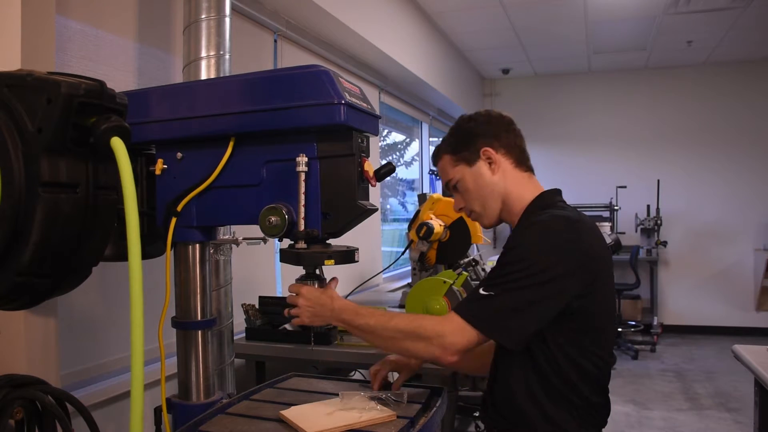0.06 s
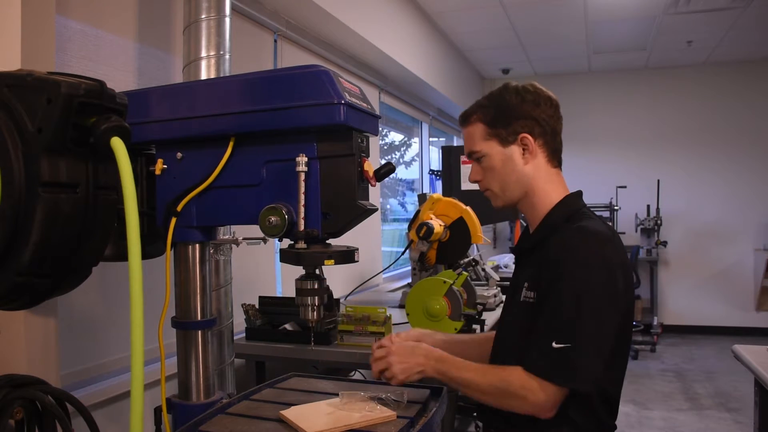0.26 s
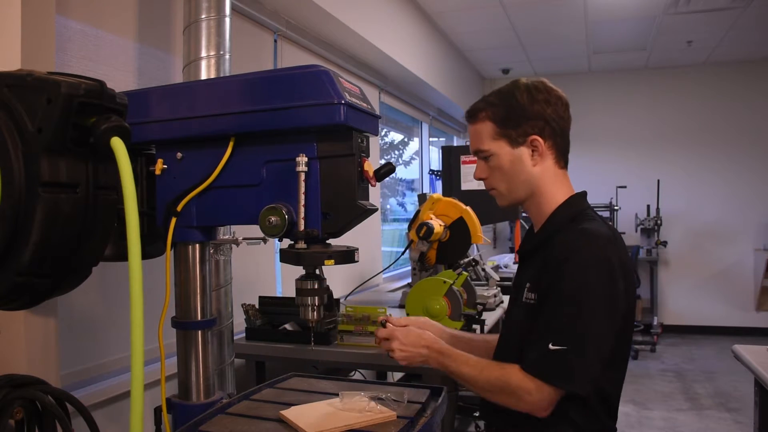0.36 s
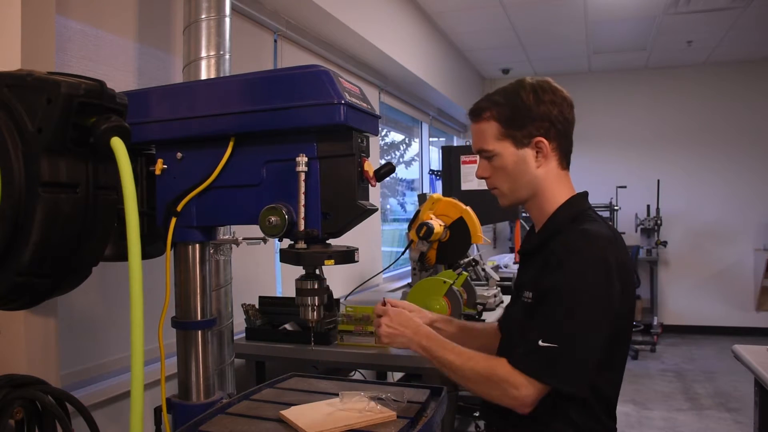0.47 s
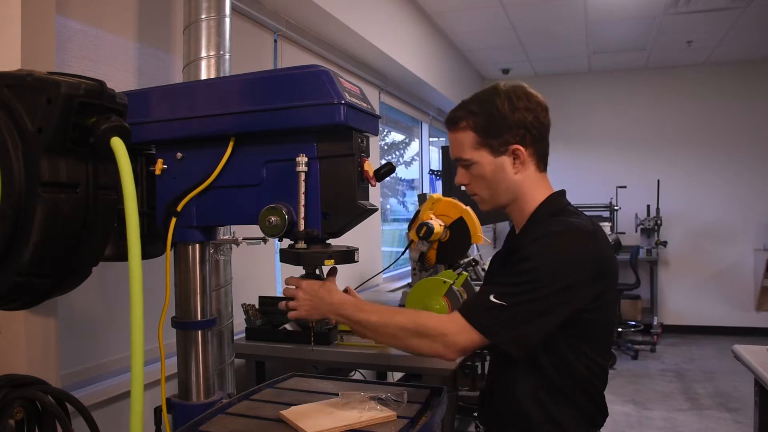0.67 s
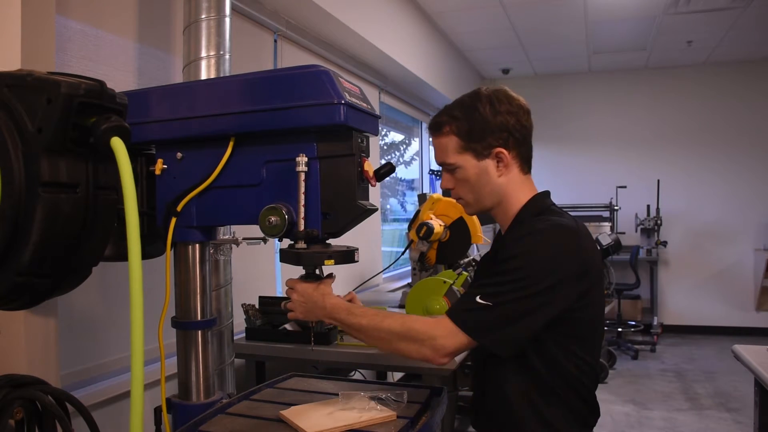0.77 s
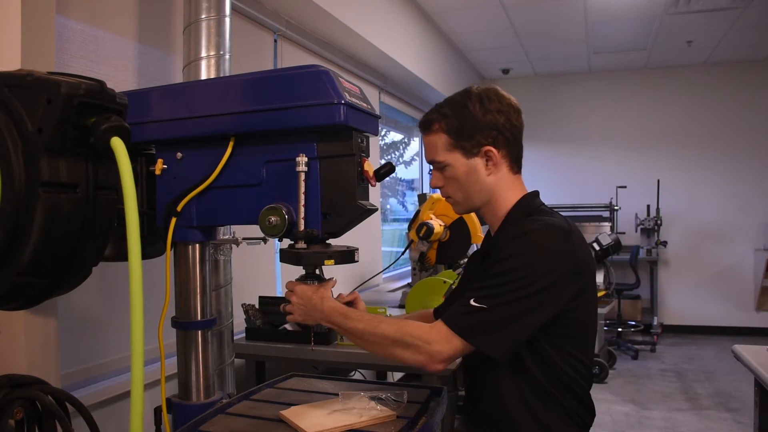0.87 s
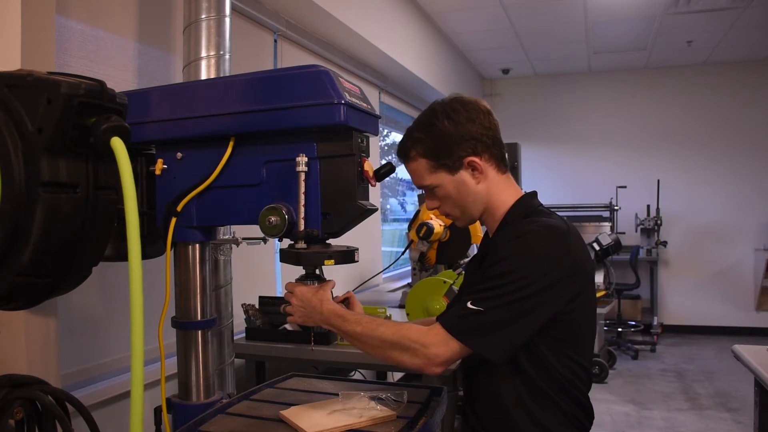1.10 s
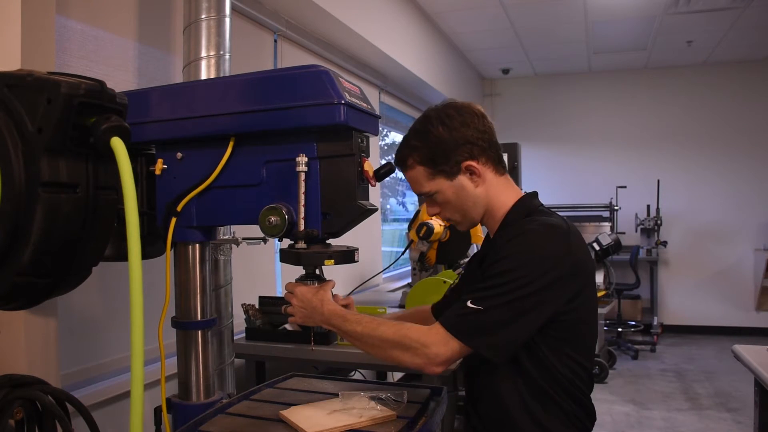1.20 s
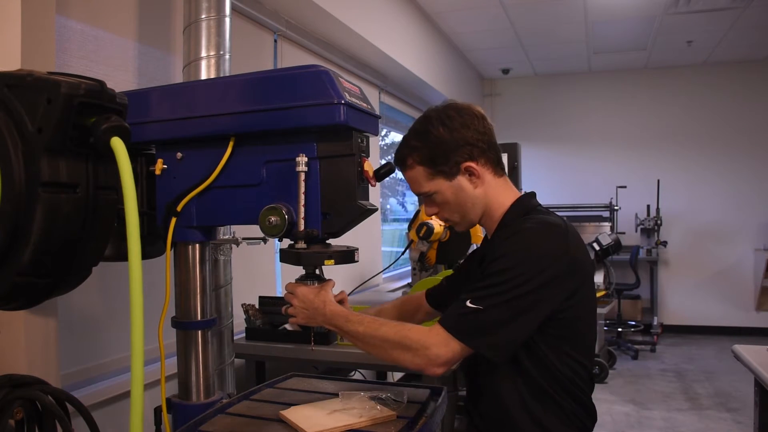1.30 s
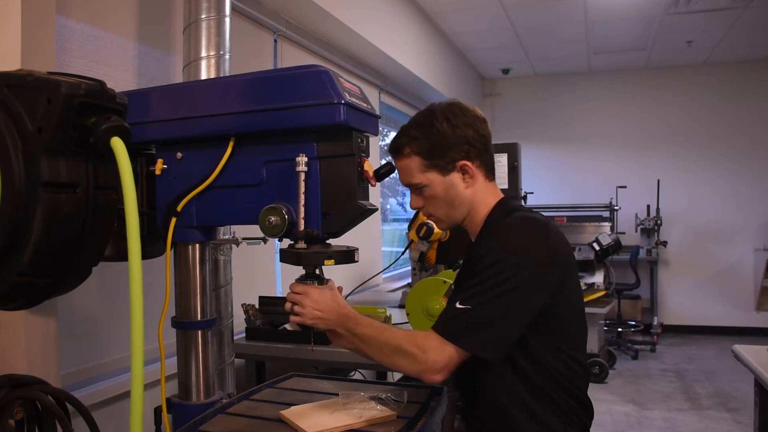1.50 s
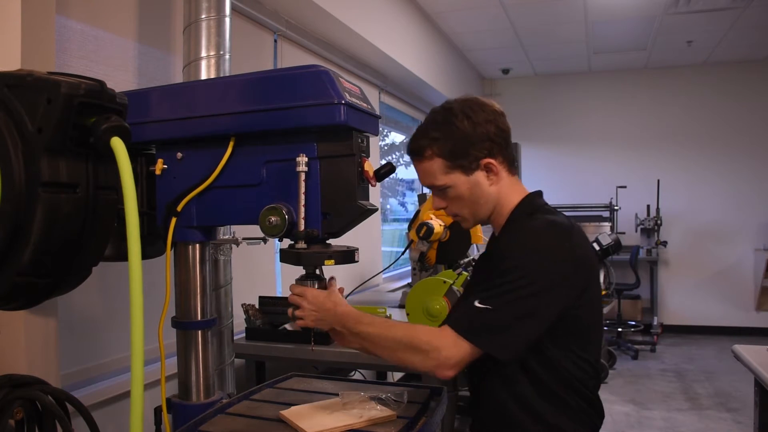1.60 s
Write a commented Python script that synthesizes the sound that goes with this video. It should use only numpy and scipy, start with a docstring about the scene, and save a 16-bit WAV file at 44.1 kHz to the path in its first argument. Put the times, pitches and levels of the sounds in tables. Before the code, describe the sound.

Metal clinks and a short scrape come from a chuck key being lifted in a quiet workshop. A soft knock and faint rubbing follow as it enters the drill chuck, then its teeth click quickly and the metal rings.

```python
"""Chuck key in a drill press

A steel chuck key clinks twice and scrapes as it is picked up, ringing freely. It seats in the chuck with a
knock, its shaft rubbing and squeaking in the hole. Then its teeth click in a quick run that sets chuck and
spindle ringing and the housing humming. Faint handling ticks and steady workshop air lie underneath."""
import sys
import numpy as np
from scipy import signal
from scipy.io import wavfile

SR = 44100
rng = np.random.default_rng(int(sys.argv[2]) if len(sys.argv) > 2 else 0)


def transcribe(u):
    """Save the signal u as a 16-bit wav file named by the first command-line argument.

    u: samples, shape (n,) or (channels, n), limited to [-1, 1]; the rate is SR.
    q: integer samples, one column per channel.
    """
    v = np.clip(np.atleast_2d(u).T, -1, 1)
    q = np.round(v * 32767).astype(np.int16)
    wavfile.write(sys.argv[1], SR, q)


N = 72765
TIME = np.arange(N) / SR


def from_db(db):
    """Decibels to gain."""
    return 10 ** (np.asarray(db) / 20)


def at_hz(colour, hz):
    """Every column of a spectrum table, read at one frequency."""
    freqs, *columns = np.transpose(colour)
    return [np.interp(np.log(hz), np.log(freqs), column) for column in columns]


def bands():
    """Centre and band-pass of each third-octave band."""
    edges_hz = np.geomspace(30, 17500, 29)
    return [(np.sqrt(low * high), signal.butter(2, [low, high], "band", fs=SR, output="sos"))
            for low, high in zip(edges_hz, edges_hz[1:])]


def soften(x, hz):
    """Two-pole low-pass: rounds off fast movement."""
    pole = np.exp(-2 * np.pi * hz / SR)
    return signal.lfilter([(1 - pole) ** 2], [1, -2 * pole, pole * pole], x)


def radiated(x, corner_hz):
    """Small parts give off little sound below a corner frequency."""
    return signal.sosfilt(signal.butter(4, corner_hz, "high", fs=SR, output="sos"), x)


def impulses(start_s, level_db, sign=1):
    """One impulse per contact."""
    force = np.zeros(N)
    np.add.at(force, np.clip((start_s * SR).astype(int), 0, N - 1), sign * from_db(level_db))
    return force + 1e-18


def loss(t60_s):
    """Gain per sample of a decay."""
    return np.exp(-np.log(1000) / (t60_s * SR))


def ring(force, hz, t60_s):
    """One mode: each impulse starts a decaying sine."""
    decay, angle = loss(t60_s), 2 * np.pi * hz / SR
    return signal.lfilter([0, np.sin(angle)], [1, -2 * decay * np.cos(angle), decay * decay], force)


def struck(start_s, level_db, modes):
    """Each blow lands on another spot, so it excites every mode with a strength and sign of its own."""
    draws = rng.standard_normal((len(start_s), 2, len(modes)))
    spread_db, sign = 5.5 * draws[:, 0], np.sign(draws[:, 1])
    return sum(ring(impulses(start_s, level_db + mode_db + spread_db[:, k], sign[:, k]), hz, t60_s)
               for k, (hz, mode_db, t60_s) in enumerate(modes))


def cracks(start_s, level_db, treble_db, colour, crack_t60_s, treble_hz=3250):
    """Dense modes of a blow: a fast crack and a tail, body and room together, that dies band by band."""
    out, white = 0, rng.choice([-1., 1.], (2, N))
    for k, (hz, bandpass) in enumerate(bands()):
        crack_db, tail_db, tail_t60_s = at_hz(colour, hz)
        shelf_db = treble_db * hz ** 2 / (hz ** 2 + treble_hz ** 2)
        energy = impulses(start_s, 2 * (level_db + shelf_db))   # twice the dB squares the gain
        power = sum(from_db(db) ** 2 * signal.lfilter([1], [1, -loss(t60_s) ** 2], energy)
                    for db, t60_s in ((crack_db, crack_t60_s), (tail_db, tail_t60_s)))
        out += signal.sosfilt(bandpass, np.sqrt(power) * white[k % 2])
    return out


def coloured(gate, colour):
    """Noise under a gate, shaped band by band."""
    white = rng.standard_normal((2, N)) * gate + 1e-18
    return sum(from_db(at_hz(colour, hz)[0]) * signal.sosfilt(bandpass, white[k % 2])
               for k, (hz, bandpass) in enumerate(bands()))


def friction(strokes, grains_per_s, fade_s):
    """Random tiny contacts while a surface slides."""
    pressure = 0
    for start_s, length_s, level_db in strokes:
        inside_s = np.minimum(TIME - start_s, start_s + length_s + fade_s - TIME)
        pressure += from_db(level_db) * np.clip(inside_s / fade_s, 0, 1)
    grains = (rng.random(N) < grains_per_s / SR) * rng.choice([-1, 1], N)
    return pressure * grains * np.sqrt(SR / grains_per_s) + 1e-18


def room_air():
    """A steady bed of workshop air, fullest in the low mids."""
    # room tone: freq_hz, level_db
    air_colour = [(30, -33), (70, -28), (130, -5), (190, 4), (240, -9.5), (320, 0.5), (520, 2.5),
                  (780, -0.5), (1100, -8), (2000, -11.5), (4000, -16), (8000, -19), (15500, -17.5)]
    return coloured(from_db(-53), air_colour)


def handling():
    """The hand makes soft ticks, a brush and one dull stick-slip creak."""
    # light touches: start_s, level_db
    ticks = [(0.042, -53), (0.06, -66), (0.0668, -44), (0.0767, -47.5), (0.0818, -48.5), (0.0845, -43),
             (0.095, -46), (0.511, -58), (0.5394, -54.5), (0.55, -67), (0.5666, -60.5), (0.5858, -57.5)]
    # their short ring: pitch_hz, level_db, t60_s
    tick_modes = [(560, 5.5, 0.003), (900, 2.5, .008), (1350, -2, .007), (3100, -7.5, 0.0087),
                  (3800, -7, 0.0071), (4800, -3.5, 0.005)]
    # the hand brushes along: start_s, length_s, level_db
    brushes = [(0.084, 0.015, -42.5), (0.1, 0.046, -49)]
    # tone of the brush: freq_hz, level_db
    brush_colour = [(100, -20), (400, -1.5), (1300, 3.5), (2200, -1.5), (4800, -6.5), (6500, -21.5),
                    (15000, -34)]
    # body of the creak: pitch_hz, level_db, t60_s
    slip_modes = [(350, 2, 0.01), (558, 10, 0.011), (1210, -1, 0.018)]
    slip, slips_per_s = np.arange(4), 339
    slips = impulses(start_s=0.0882 + slip / slips_per_s, level_db=-42.5 - 4 * slip)
    creak = sum(from_db(db) * ring(slips, hz, t60_s) for hz, db, t60_s in slip_modes)
    brush = coloured(friction(brushes, grains_per_s=2000, fade_s=.004), brush_colour)
    ticking = struck(*np.transpose(ticks), tick_modes)
    return radiated(ticking + creak, corner_hz=152) + brush


def housing(pitch_hz=530, rise_s=.026):
    """One low mode of the press housing swells after a heavy blow and dies away."""
    # hums after the blows: start_s, level_db
    hums = [(0.724, -54), (1.2303, -48), (1.335, -42.5), (1.557, -48.5)]
    out = 0
    for start_s, level_db in hums:
        age_s = np.maximum(TIME - start_s, 0)
        swell = age_s / rise_s * np.exp(1 - age_s / rise_s)
        out += from_db(level_db) * swell * np.sin(2 * np.pi * pitch_hz * age_s)
    return out


def shaft(waver_depth_hz=106.5):
    """The key shaft rubs in its hole and now and then catches in a wavering squeak."""
    # rubbing strokes: start_s, length_s, level_db
    rubs = [(0.74, 0.16, -48.5), (0.902, 0.058, -44.5), (0.939, 0.0067, -53), (1.03, 0.0091, -47),
            (1.1, 0.035, -49), (1.223, 0.011, -25.5), (1.52, 0.018, -40.5), (1.59, 0.02, -56)]
    # tone of the rub: freq_hz, level_db
    rub_colour = [(300, -17), (900, -6.5), (1400, -2), (1750, 0), (2300, -42), (3800, -16.5), (6000, -38),
                  (15000, -28)]
    # the shaft catches: start_s, length_s, pitch_hz, level_db
    squeaks = [(0.913, 0.018, 1430, -47), (0.929, 0.039, 1380, -49.5), (1.0743, 0.0077, 1442, -47)]
    out = coloured(friction(rubs, grains_per_s=3000, fade_s=.004), rub_colour)
    waver = soften(rng.standard_normal(N), hz=210)
    waver_hz = waver_depth_hz * waver / waver.std()
    for start_s, length_s, pitch_hz, level_db in squeaks:
        swell = np.sin(np.pi * np.clip((TIME - start_s) / length_s, 0, 1))
        phase = 2 * np.pi * np.cumsum(pitch_hz + waver_hz) / SR
        out += from_db(level_db) * swell * np.sin(phase)
    return out


def tooth_tips():
    """Two hard contacts add the thin, very high ping of a tooth tip."""
    # tip contacts: start_s, level_db
    pings = [(0.1335, -21), (1.233, -27.5)]
    # ring of a tip: pitch_hz, level_db, t60_s
    tip_modes = [(9950, -6, .018), (14800, -4, .014), (15330, 0, .02), (15620, -2, .016)]
    return struck(*np.transpose(pings), tip_modes)


def key():
    """The loose key clinks and scrapes; both set its steel ringing freely."""
    # the key strikes metal: start_s, level_db, treble_db, ring_db
    clinks = [(0.1337, -8.5, 2.5, -42.5), (0.1521, -14, 8.5, -37.5)]
    # dense short ring of a clink: freq_hz, crack_db, tail_db, tail_t60_s
    clink_colour = [(61.1, -26.5, -61, .08), (139.8, -14, -46.5, 0.097), (237, -22, -48.5, 0.18),
                    (506, -19.5, -30.5, 0.26), (855, -21, -33, 0.75), (1250, -6.5, -15.5, 0.19),
                    (2780, -3, -14, 0.073), (4170, -6.5, -22, 0.3), (7800, -10, -27, 0.22),
                    (13000, -29, -19.5, 0.036), (15440, -9, -33, 0.069)]
    # the key slides as it is lifted: start_s, length_s, level_db
    scrapes = [(0.127, 0.0018, -41), (0.16, 0.025, -33), (0.204, 0.0258, -34.5), (0.236, 0.012, -44)]
    # tone of the scrape: freq_hz, level_db
    scrape_colour = [(50, -75), (250, -54.5), (700, -30), (1100, -4.5), (2800, 6), (4300, -8.5), (5500, -3),
                     (9000, -16.5), (13000, -14), (15500, -26)]
    # free ring of the key: pitch_hz, level_db, t60_s
    key_modes = [(1048, -1, .24), (1583, 1, .24), (1790, -11, .11), (2038, -4, .12), (2402, -6, .19),
                 (2713, -4, .16), (2752, -1, .18), (2889, -4, .14), (3090, 7, .105), (3381, -4, .16),
                 (3526, -7, .18), (4301, -16, .15), (5032, -6, .12), (5170, -8, .14), (5502, -4, .1),
                 (6562, -6, .11), (7950, -8, .09), (8300, -15, .14), (10972, -14, .12), (11660, -12, .09),
                 (15490, 5, .05)]
    start_s, level_db, treble_db, ring_db = np.transpose(clinks)
    grains = friction(scrapes, grains_per_s=2500, fade_s=.005)
    scrape_ring = sum(from_db(db - 39) * ring(grains, hz, t60_s) for hz, db, t60_s in key_modes)
    scrape_ring = soften(scrape_ring, hz=8100)   # a gentle contact has less treble
    clink_ring = struck(start_s, ring_db, key_modes)
    impacts = cracks(start_s, level_db, treble_db, clink_colour, crack_t60_s=.015)
    return impacts + radiated(clink_ring + scrape_ring, corner_hz=920) + coloured(grains, scrape_colour)


def chuck():
    """Each tooth of the key bites at a pitch of its own and sets the chuck ringing low."""
    # teeth meet the chuck: start_s, level_db, treble_db, ring_db, bite_hz, bite_db
    clicks = [(0.3807, -55.5, 12, -98, 4000, -97), (0.7135, -44.5, 8, -69, 1400, -42.5),
              (0.7243, -26, -16, -52.5, 2230, -52), (0.8325, -59.5, 21, -69.5, 3470, -60.5),
              (0.8855, -38, -11.5, -91, 1410, -46.5), (0.9145, -46.5, 2, -68, 1460, -40),
              (1.0224, -49.5, 8.5, -77, 1930, -67), (1.1377, -30, 5, -61, 3920, -40),
              (1.1791, -16.5, 5, -41.5, 1860, -20), (1.2311, -12.5, -0.5, -44.5, 1395, -21),
              (1.2856, -9.5, -27, -46, 1880, -60), (1.2897, -40.5, 16.5, -106, 1330, -31),
              (1.3242, -15, 0, -42, 2330, -20), (1.5342, -21.5, -23.5, -54, 1770, -37),
              (1.552, -46, -10, -62, 750, -33.5)]
    # dense short ring of a click: freq_hz, crack_db, tail_db, tail_t60_s
    click_colour = [(50, -21, -56, .1), (134, -7.5, -44, 0.067), (229, -35, -42, 0.16),
                    (327, -49, -39.5, 0.31), (463, -31, -20, 0.27), (670, -23, -7.5, 0.31),
                    (890, -5.5, -16, 0.21), (1360, -5.5, -8.5, 0.17), (1950, 2, -17.5, 0.27),
                    (2970, -4, -18.5, 0.12), (5300, -8.5, -19, 0.094), (9400, -11.5, -45.5, 0.18),
                    (13500, -10.5, -28, 0.083), (15500, -11.5, -40, 0.014)]
    # ring of chuck and spindle: pitch_hz, level_db, t60_s
    chuck_modes = [(533, -5, .18), (618, 5, .2), (655, 0, .11), (745, -3, .11), (805, 8, .14),
                   (891, -1, .33), (1045, -9, .12), (1242, -6, .2), (1310, -5, .14), (1480, -4, .1),
                   (1685, -2, .15), (1850, 5, .075), (2040, 0, .06), (2220, -1, .07), (2387, -6, .2),
                   (3052, -11, .18), (3241, -13, .2)]
    start_s, level_db, treble_db, ring_db, bite_hz, bite_db = np.transpose(clicks)
    bites = sum(ring(impulses(np.array([at_s]), db), hz, t60_s=.016)
                for at_s, hz, db in zip(start_s, bite_hz, bite_db))
    impacts = cracks(start_s, level_db, treble_db, click_colour, crack_t60_s=.018)
    ringing = struck(start_s, ring_db, chuck_modes)
    return impacts + radiated(bites + ringing, corner_hz=486)


def scene():
    """Key, press, hand and room, mixed to mono."""
    return (key() + chuck() + housing() + tooth_tips() + shaft() + handling() + room_air())[None]


def record(dry):
    """The bass is shelved down and the very top is cut steeply."""
    low_cut_hz, bass_leak_db, high_cut_hz = 284, -15.5, 16100
    thin = signal.sosfilt(signal.butter(6, low_cut_hz, "high", fs=SR, output="sos"), dry)
    bass = signal.sosfilt(signal.butter(2, low_cut_hz / 2, fs=SR, output="sos"), dry)
    high_cut = signal.ellip(8, .3, 70, high_cut_hz, fs=SR, output="sos")
    return signal.sosfilt(high_cut, thin + from_db(bass_leak_db) * bass)


dry = scene()
out = record(dry)
transcribe(out)
```